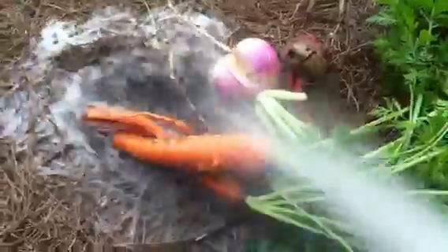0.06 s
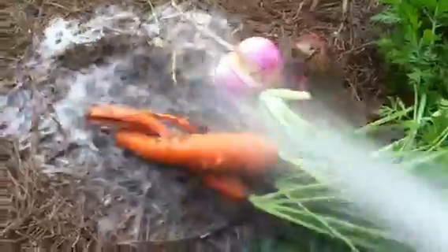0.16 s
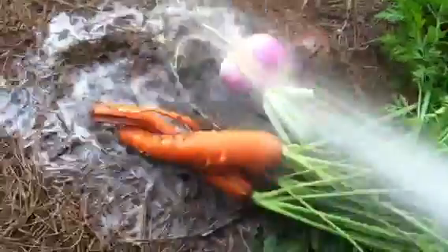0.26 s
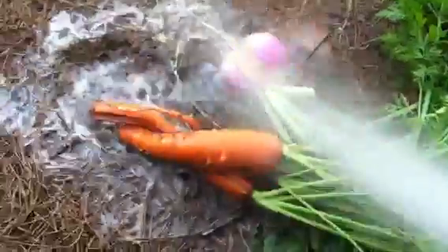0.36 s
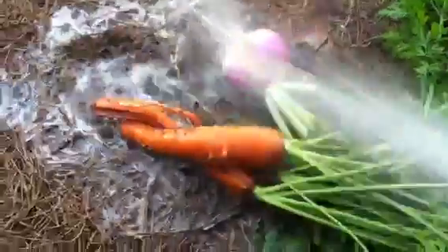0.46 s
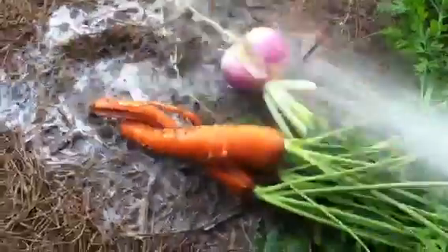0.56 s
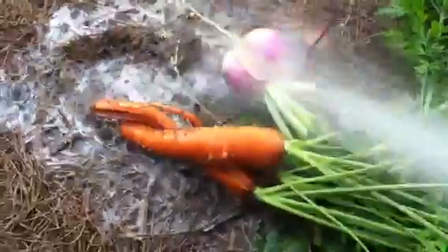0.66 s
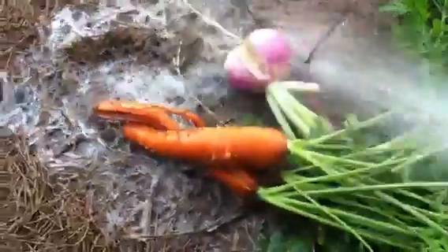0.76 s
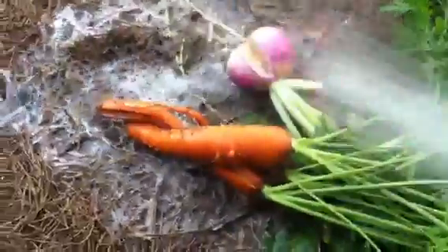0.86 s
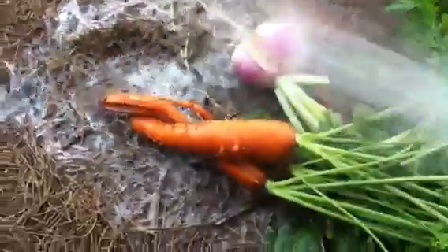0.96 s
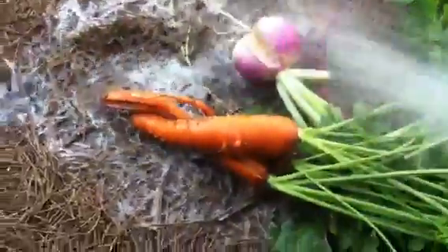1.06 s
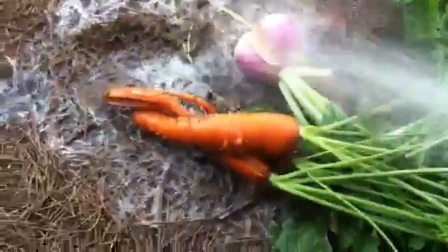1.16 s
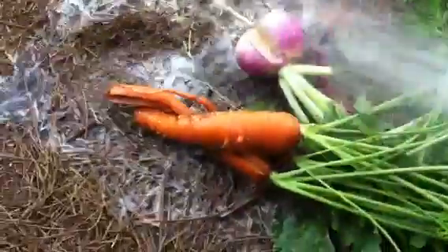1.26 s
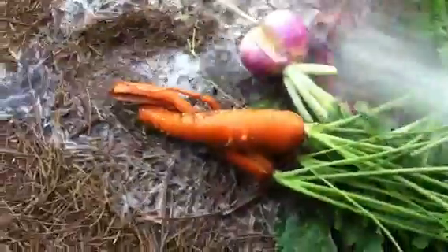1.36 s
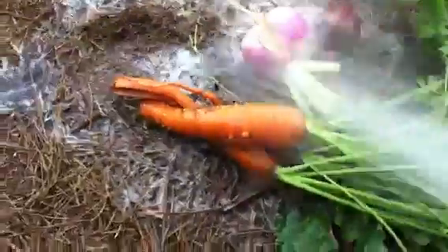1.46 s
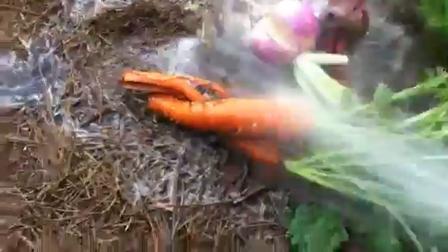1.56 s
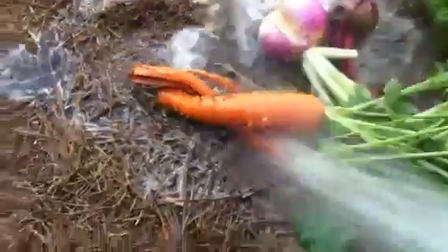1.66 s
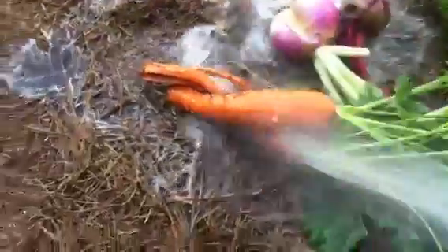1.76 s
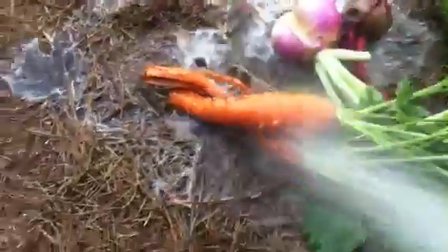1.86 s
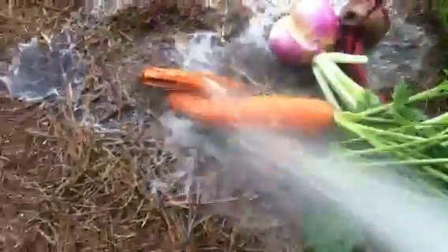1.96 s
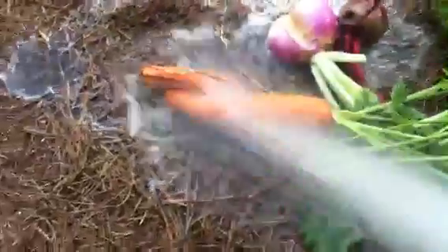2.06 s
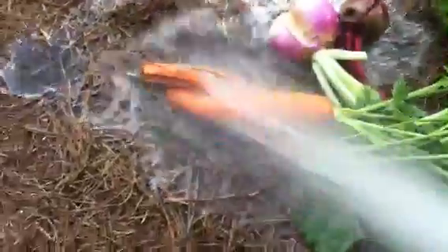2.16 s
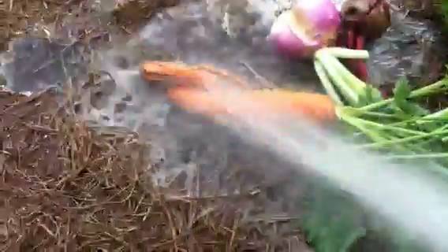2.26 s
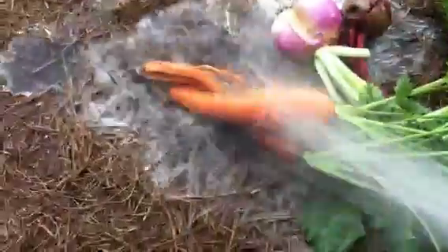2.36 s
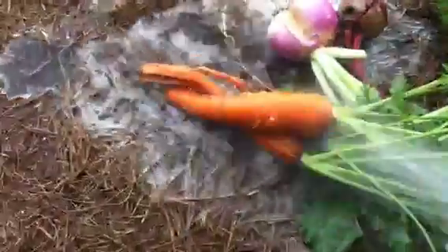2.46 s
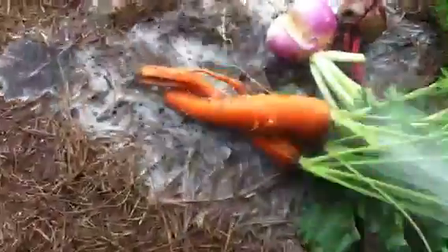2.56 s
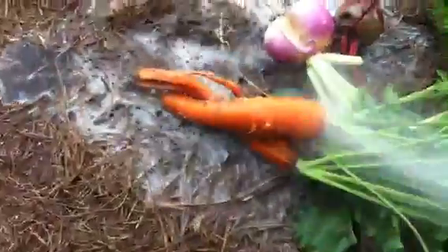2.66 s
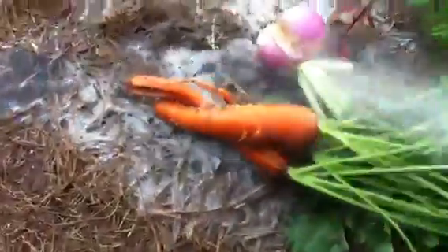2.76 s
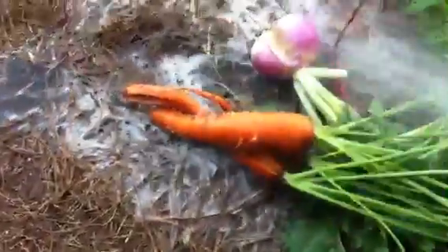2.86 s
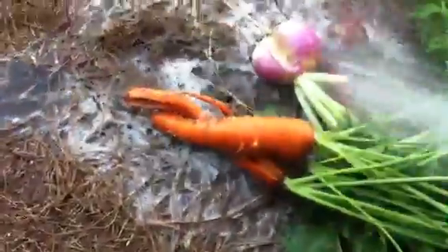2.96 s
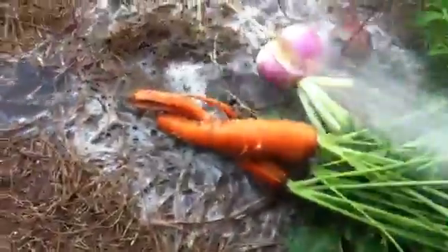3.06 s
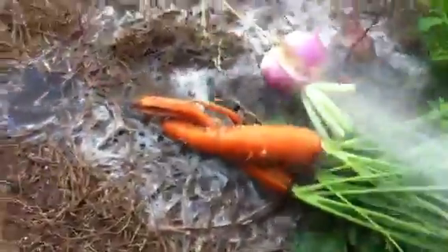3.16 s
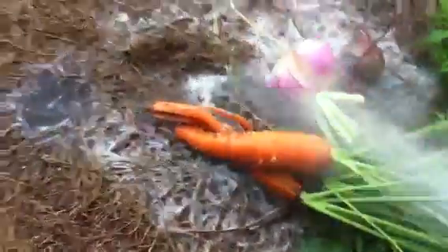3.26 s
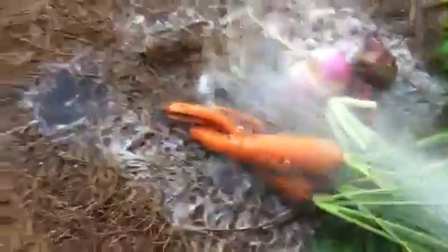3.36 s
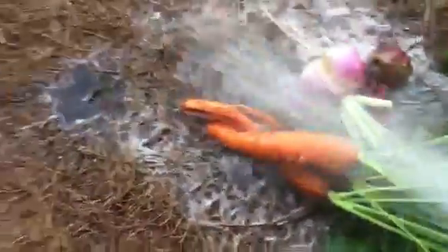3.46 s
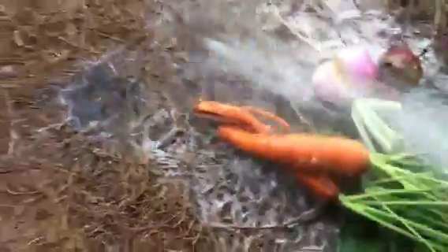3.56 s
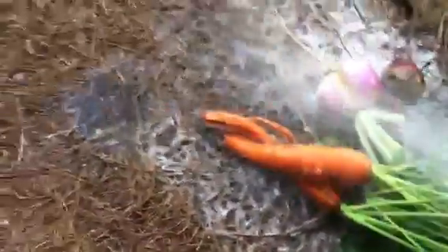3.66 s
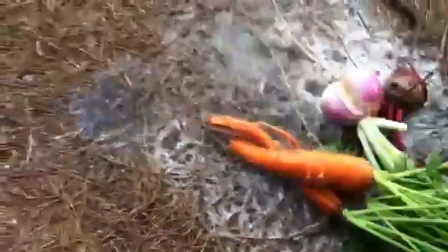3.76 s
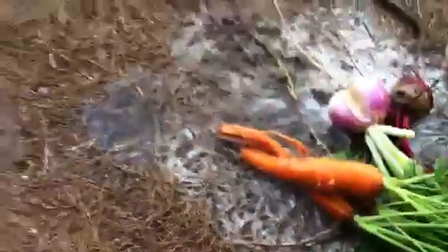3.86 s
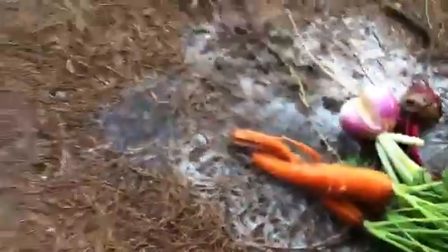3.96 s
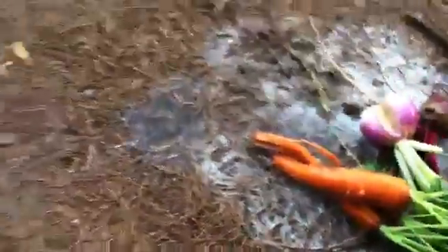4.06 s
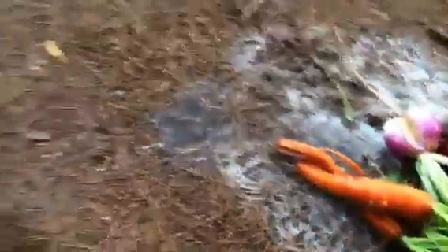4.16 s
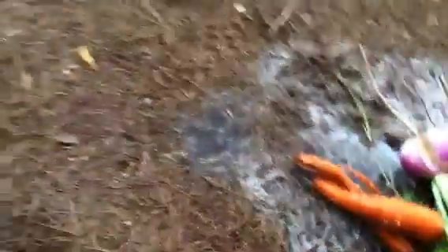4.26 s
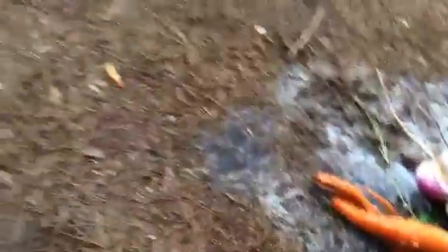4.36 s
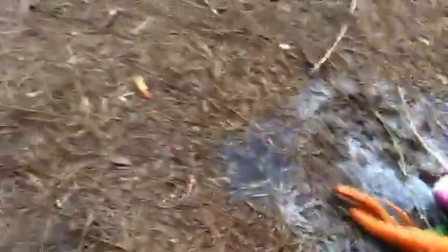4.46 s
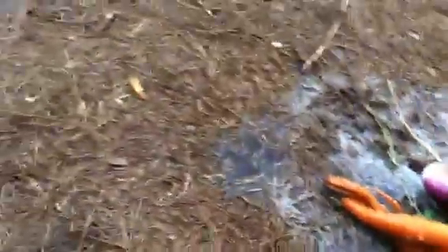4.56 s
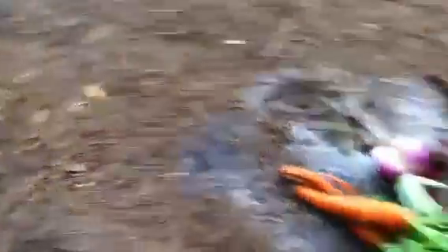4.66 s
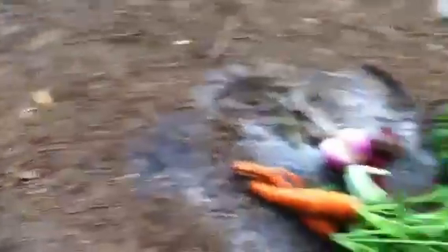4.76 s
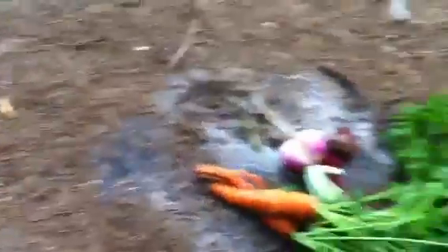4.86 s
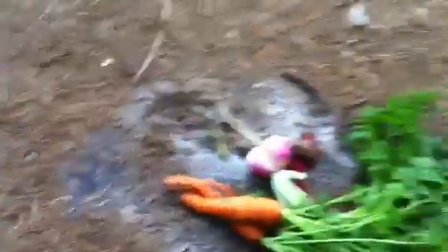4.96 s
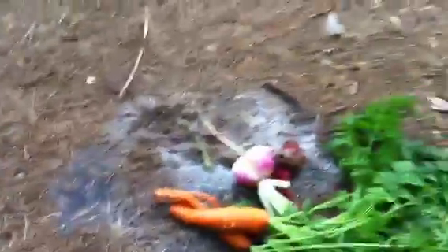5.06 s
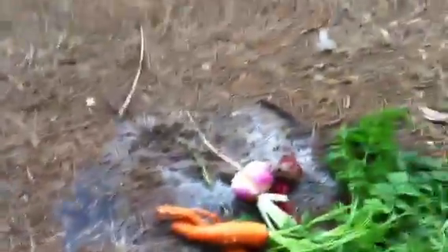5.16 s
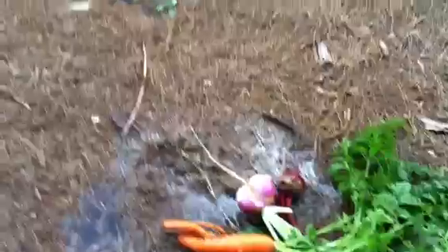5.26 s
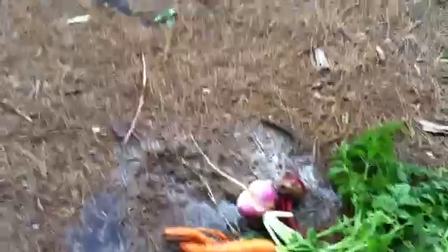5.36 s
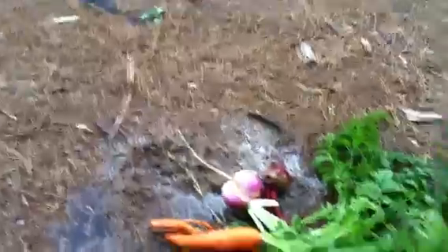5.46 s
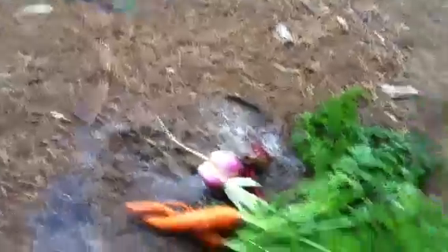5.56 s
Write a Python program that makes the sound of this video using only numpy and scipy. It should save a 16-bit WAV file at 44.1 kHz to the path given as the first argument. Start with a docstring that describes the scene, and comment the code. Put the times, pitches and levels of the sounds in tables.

```python
"""A hose nozzle close to the microphone sprays vegetables lying on soil until its valve shuts.
The spray is many tiny noise bursts mixed with patchy noise, filtered into fizz, hiss, spatter, tube
ring, splash and drumming; ringing slugs, low thuds and a whistle join it.
The valve eases, snaps nearly shut, lets one spurt through and seals. Then a quiet garden wash
remains, with rustling stalks (filtered snaps), faint gurgles (sliding tones) and one crunchy knock."""
import sys
import numpy as np
from scipy import signal
from scipy.io import wavfile
from scipy.ndimage import uniform_filter1d

SR = 44100
rng = np.random.default_rng(int(sys.argv[2]) if len(sys.argv) > 2 else 0)


def inscribe(sig):
    """Save sig as 16-bit PCM at rate SR to the path in sys.argv[1].

    A 1-D sig is mono; a 2-D sig holds one channel per row.
    Samples are clipped to [-1, 1] before scaling.
    """
    pcm = np.round(np.clip(np.atleast_2d(sig).T, -1, 1) * 32767)
    wavfile.write(sys.argv[1], SR, pcm.astype(np.int16))


N = 247356  # length of the scene in samples


def gain_of(db):
    """Turn decibels into a plain multiplier."""
    return 10 ** (np.asarray(db) / 20)


def evened(x):
    """Scale to an average (RMS) strength of 1."""
    return x / np.sqrt(np.mean(x ** 2) + 1e-20)


def follow(rows):
    """Draw straight lines between the rows of a table, giving each column at every sample."""
    s, *columns = np.transpose(rows)
    return [np.interp(np.arange(N) / SR, s, column) for column in columns]


def add(mix, s, sound):
    """Mix a short sound in at s seconds, cutting it off at the end of the scene."""
    part = mix[round(s * SR):][:len(sound)]
    part += sound[:len(part)]


def colour(x, points):
    """Filter to the given spectrum; the filter never acts ahead of time (minimum phase)."""
    f, db = np.transpose(points)
    hz = abs(np.fft.fftfreq(8192, 1 / SR))
    spectrum_db = np.interp(np.log(hz + 1), np.log(f + 1), db)
    log_gain = np.log(gain_of(np.maximum(spectrum_db, -90)))
    # the phase follows from the log gain
    response = np.exp(np.conj(signal.hilbert(log_gain)))
    taps = np.fft.ifft(response).real[:4096]
    return evened(signal.oaconvolve(x, taps)[:N])


def ticks(per_s, spread_db, length_s):
    """Short bursts of noise at random moments, many small and a few large."""
    chance, size, noise = rng.random(N), rng.exponential(1, N), rng.standard_normal(N)
    starts = chance < per_s / SR
    power = gain_of(2 * spread_db * np.minimum(size, 4.2)) * starts
    t = np.arange(400) / SR / length_s
    burst_power = t * np.exp(-4 * t)  # peaks a quarter of the way through the length
    return evened(noise * np.sqrt(abs(signal.oaconvolve(power, burst_power)[:N])))


def patchy(patchy_db, span_s):
    """Noise whose level wanders in patches of time and frequency."""
    a, b, patches = rng.standard_normal((N // 64 + 8, 129, 3)).T
    patches = uniform_filter1d(patches, 5, 0)  # smooth over frequency, then over time
    patches = uniform_filter1d(patches, max(round(span_s * SR / 64), 1), 1)
    z = (a + 1j * b) * gain_of(patchy_db * evened(patches))
    return evened(signal.istft(z, nperseg=256, noverlap=192)[1][:N])


def flutter(depth_db, span_s):
    """Smooth random wobble around 1, for a level or a pitch."""
    size = max(round(span_s * SR), 1)
    smooth = uniform_filter1d(uniform_filter1d(rng.standard_normal(N), size), size)
    return gain_of(depth_db * evened(smooth))


def resonate(x, hz, width_hz):
    """A resonance of gain 1 that follows the pitch hz."""
    turn = np.exp(2j * np.pi * np.cumsum(hz * np.ones(N)) / SR)
    r = np.exp(-np.pi * width_hz / SR)
    # shift the pitch down to zero, smooth, then shift it back
    return 2 * (turn * signal.lfilter([1 - r], [1, -r], x / turn)).real


# the jet swinging over the ground, before valve and flutter:
# (time [s], fizz level [dB], hiss level [dB], splash level [dB], drumming level [dB])
JET_LEVELS = [(0.0, -27, -30, -38, -44.5), (0.3, -27, -30, -45, -56), (0.43, -27, -31, -41.5, -51),
              (0.77, -28.5, -30, -46.5, -57), (0.87, -29, -31.5, -46, -55), (1.15, -29, -31, -46, -53.5),
              (1.46, -30.5, -31.5, -46, -54.5), (1.51, -26.5, -29.5, -43.5, -51),
              (1.57, -26, -31.5, -44.5, -52.5), (1.77, -26.5, -27.5, -43, -48),
              (1.82, -27, -30, -42.5, -55), (1.92, -26, -28.5, -42, -49), (2.01, -27, -29.5, -44.5, -47),
              (2.06, -26, -30, -42.5, -49), (2.17, -26.5, -30, -41.5, -50), (2.29, -26, -28.5, -41.5, -50),
              (2.35, -26, -29, -43, -49), (2.38, -26, -29, -42.5, -58), (2.42, -27, -30.5, -44, -55),
              (2.62, -30.5, -33, -45, -60), (2.74, -28, -31, -44.5, -52), (2.88, -30.5, -33, -47.5, -54.5),
              (3.27, -28.5, -31, -46, -52), (3.29, -27.5, -31, -44, -47), (3.46, -28, -30.5, -40, -49),
              (3.72, -29.5, -32, -44, -51), (3.74, -28.5, -30, -40, -49)]
# spatter on the vegetables, before valve and flutter: (time [s], level [dB])
SPATTER_LEVELS = [(0, -41), (.2, -39), (.45, -41.5), (.62, -43), (.8, -42), (1.1, -41.5), (1.46, -42.5),
                  (1.72, -37.5), (1.86, -40.5), (1.92, -36.5), (2.0, -39.5), (2.36, -38.5), (2.61, -41.5),
                  (3.0, -42), (3.24, -44), (3.3, -40), (3.5, -42.5), (3.74, -41)]
# how each part's sound is spread over pitch: (frequency [Hz], relative level per Hz [dB])
FIZZ_COLOUR = [(4000, -75), (7100, -10), (8040, -2), (9140, .5), (9960, -1), (11000, -10.5), (12700, -5.5),
               (13500, -9.5), (15000, -27), (15700, -30)]
HISS_COLOUR = [(2400, -48), (3450, -11), (3650, -6), (3820, 0), (4080, -3.5), (4450, 0), (4850, -2),
               (5080, -6.5), (5700, -6), (6450, -5), (7150, -9.5), (8500, -29.5)]
SPATTER_COLOUR = [(1200, -71), (2220, -10), (2430, -3), (2650, -5), (3150, 0), (3400, -1.5), (3650, -6),
                  (4400, -32.5)]
TUBE_COLOUR = [(400, -68), (800, -36), (1150, -14), (1420, -5.5), (1560, -1), (1640, 0.5), (1720, -2.5),
               (1830, -6), (2050, -12), (2220, -23), (2700, -44)]
SPLASH_COLOUR = [(120, -53), (250, -34), (400, -4.5), (480, -3.5), (600, -5.5), (800, 1), (1150, -2),
                 (1500, -24), (2000, -48.5)]
DRUM_COLOUR = [(25, -47), (60, -33), (120, -11.5), (200, -0.5), (290, 0), (380, -4.5), (550, -18),
               (900, -51.5)]
# droplets, one row each for fizz, hiss, spatter, tube, splash, drumming:
# (rate [bursts/s], size spread [dB], burst length [s], own bursts [share of power],
#  common bursts [share of power], patchiness of the remaining noise [dB])
DROPLETS = [(2055, 4, 0.00072, 0.42, 0.14, 0.5), (2030, 2, 0.0014, 0.29, 0.12, 1.5),
            (2000, 2, .0015, .25, .1, 1.5), (2500, 2.5, 0.0017, 0.22, 0.055, 1.7),
            (602, 3, 0.0021, 0.23, 0.067, 1.5), (150.6, 2.5, 0.0084, 0.14, 0.022, 1.4)]
# the tube ring takes a share of the fizz's swings and chokes as the valve eases
TUBE_DB, TUBE_SHARE, USUAL_FIZZ_DB = -34, 0.44, -28
CHOKE_DB, CHOKE_S = -6, 0.014
SPUTTER_DB, SPUTTER_S = 2.5, .004  # the flow breaks up once the valve eases: depth, smoothing time


def jet():
    """Droplet bursts and turbulence colour each part; all share the flow and its flutter."""
    fizz_db, hiss_db, splash_db, drum_db = follow(JET_LEVELS)
    spatter_db = follow(SPATTER_LEVELS)[0]
    choke = np.clip((np.arange(N) / SR - EASE_S) / CHOKE_S, 0, 1)
    tube_db = TUBE_DB + TUBE_SHARE * (fizz_db - USUAL_FIZZ_DB) + CHOKE_DB * choke
    flow = gain_of(valve()) * evened(flutter(0.45, 0.023) * flutter(0.74, 0.0032))
    flow = flow * flutter(SPUTTER_DB * choke, SPUTTER_S)
    common = ticks(1500, 4.4, 0.00028)  # bursts heard in every part at once
    colours = (FIZZ_COLOUR, HISS_COLOUR, SPATTER_COLOUR, TUBE_COLOUR, SPLASH_COLOUR, DRUM_COLOUR)
    levels = (fizz_db, hiss_db, spatter_db, tube_db, splash_db, drum_db)
    out = np.zeros(N)
    for part, db, drops in zip(colours, levels, DROPLETS):
        per_s, spread_db, length_s, own, shared, patchy_db = drops
        smooth = np.sqrt(max(1 - own - shared, 0))
        own_bursts = np.sqrt(abs(own)) * ticks(per_s, spread_db, length_s)
        bursts = own_bursts + np.sqrt(abs(shared)) * common
        out += gain_of(db) * colour(bursts + smooth * patchy(patchy_db, .04), part)
    out += whistle(tube_db)
    return flow * nozzle_notches(out)


# narrow whistle in the tube, before its small waver: (time [s], pitch [Hz])
WHISTLE_PITCH = [(0, 1610), (.5, 1624), (1.1, 1666), (1.5, 1615), (1.8, 1640), (2.1, 1590), (2.5, 1660),
                 (2.9, 1650), (3.3, 1554), (3.75, 1570)]
WHISTLE_DB, WHISTLE_WIDTH_HZ = -7.5, 75  # level against the tube ring


def whistle(tube_db):
    """Noise through a narrow resonance of the tube whose pitch drifts and wavers."""
    pitch = follow(WHISTLE_PITCH)[0] * flutter(0.16, 0.028)
    tone = evened(resonate(rng.standard_normal(N), pitch, WHISTLE_WIDTH_HZ))
    return gain_of(tube_db + WHISTLE_DB) * tone


# pitches that the nozzle cancels: (frequency [Hz], width [Hz], removed [share])
CANCELLED = [(2220, 136, 0.49), (5080, 170, 0.26), (7070, 270, 0.41)]


def nozzle_notches(out):
    """The nozzle partly cancels a few pitches: subtract a share of each narrow band."""
    for hz, width_hz, share in CANCELLED:
        out = out - share * resonate(out, hz, width_hz)
    return out


# spectrum of the outdoor wash: (frequency [Hz], relative level per Hz [dB])
GARDEN_COLOUR = [(25, -16), (60, -12), (120, 2.5), (240, -0.5), (850, -4), (1150, -6.5), (1900, -7.5),
                 (3500, -11), (4200, -8.5), (4750, -7), (5200, -12.5), (9500, -11), (11000, -17),
                 (14000, -21), (15500, -47)]
GARDEN_DB = -57.5
LULL_S, LULL_DB, LULL_WIDTH_S = 5.485, -2.5, .035  # the wash dips briefly


def garden():
    """Distant wash of the outdoors: patchy noise, coloured."""
    lull_db = LULL_DB * np.exp(-((np.arange(N) / SR - LULL_S) / LULL_WIDTH_S) ** 2)
    return gain_of(GARDEN_DB + lull_db) * colour(patchy(0.87, .06), GARDEN_COLOUR)


# the jet thumps into hollows of the wet soil, pitch before its waver:
# (time of peak [s], level [dB], pitch [Hz])
SOIL_THUDS = [(.21, -49, 250), (.42, -52, 260), (1.515, -44.5, 290), (1.75, -50.5, 200.5), (1.99, -44, 250),
              (2.0, -46, 330), (2.225, -45, 270), (2.25, -47.5, 204.6), (2.33, -49, 185), (3.39, -47, 280)]
THUD_S, THUD_WAVER_DB = .018, 1.1  # width of the swell; pitch waver as dB of frequency ratio


def thuds():
    """Thumps into wet hollows: short low tones that swell, fade and waver in pitch."""
    t, out = np.arange(-3 * THUD_S, 3 * THUD_S, 1 / SR), np.zeros(N)
    swell = np.exp(-.5 * (t / THUD_S) ** 2)
    waver = flutter(THUD_WAVER_DB, .01)
    for s, db, hz in SOIL_THUDS:
        start = s - 3 * THUD_S
        turns = np.cumsum(hz * waver[round(start * SR):][:len(t)]) / SR
        add(out, start, gain_of(db) * np.sqrt(2) * swell * np.sin(2 * np.pi * turns))
    return out


# big slugs of water leaving the nozzle: (start [s], peak level of the ring [dB], pitch [Hz])
WATER_SLUGS = [(.2500, -11.5, 8680), (.3244, -11, 9120), (.3688, -13, 8630), (.369, -21, 5600),
               (.445, -17.5, 4000), (.8, -16, 6000), (1.1105, -11.5, 9110), (1.48, -11.5, 9730),
               (1.598, -10.5, 8420), (1.7154, -11, 4370), (1.7278, -14, 8700), (1.8505, -15, 8800),
               (1.9347, -10, 8890), (2.1912, -10, 9090), (2.3273, -10, 9300), (2.992, -14, 8920),
               (3.1069, -9.5, 8700), (3.2633, -9.5, 8350), (3.7371, -13.5, 1570), (3.7385, -18, 2030),
               (3.7585, -17, 9400), (3.7605, -20, 9400), (3.8095, -20, 9230), (3.8095, -32, 1610),
               (3.8105, -28, 6100), (3.838, -30, 9500), (3.850, -33, 9300), (3.854, -39, 6800),
               (3.860, -35, 9300)]
SLUG_RISE_S, SLUG_SLOWING = 0.00029, 0.69  # rise at 9 kHz; lower rings rise slower (power of pitch)
SLUG_TICK_DB, SLUG_TICK_RISE_S = -12, 0.0003  # wide tick, level against the ring


def slugs():
    """Each slug rings a nozzle resonance for a few cycles and carries a wide tick in the hiss band."""
    out, t = np.zeros(N), np.arange(600) / SR
    noise = colour(rng.standard_normal(N), HISS_COLOUR)
    v = t / SLUG_TICK_RISE_S
    tick_shape = gain_of(SLUG_TICK_DB) * (v * np.exp(1 - v)) ** 2
    for s, db, hz in WATER_SLUGS:
        u = t / SLUG_RISE_S * (hz / 9000) ** SLUG_SLOWING
        ring = (u * np.exp(1 - u)) ** 1.7 * np.sin(2 * np.pi * hz * t)
        tick = tick_shape * noise[round(s * SR):][:len(t)]
        add(out, s, gain_of(db) * (ring + tick))
    return out


# the valve eases, snaps nearly shut, lets one spurt through, then seals
EASE_S, EASE_DB, SNAP_S, SNAP_DB_PER_S = 3.742, -8, 3.812, -480
SPURT_S, SPURT_DB, SPURT_RISE_DB_PER_S, SEAL_DB_PER_S = 3.856, -15.5, 180, -900
DRIBBLE_DB, DRIBBLE_DB_PER_S = -30, -150  # the last drops dribble away


def valve():
    """Flow in dB while the valve closes: the strongest of closing, spurt and dribble wins."""
    t = np.arange(N) / SR
    easing = EASE_DB * np.clip((t - EASE_S) / (SNAP_S - EASE_S), 0, 1)
    closing = easing + SNAP_DB_PER_S * np.maximum(t - SNAP_S, 0)
    spurt = SPURT_DB + np.where(t < SPURT_S, SPURT_RISE_DB_PER_S, SEAL_DB_PER_S) * (t - SPURT_S)
    dribble = DRIBBLE_DB + DRIBBLE_DB_PER_S * np.maximum(t - SPURT_S, 0)
    return np.maximum(np.maximum(closing, spurt), np.maximum(dribble, -100))


# dry stalks stirring:
# (time of peak [s], level before thinning [dB], rise [s], fall [s], body taken out [dB])
STIRS = [(4.388, -60, .02, .01, 12), (5.37, -56.5, 0.1, 0.08, -1), (5.565, -56, 0.02, .2, 0)]
# spectrum of the stalks: (frequency [Hz], relative level per Hz [dB])
STRAW_COLOUR = [(100, -20), (300, -3), (600, 1), (1200, -4), (1900, -3), (3200, -9), (4700, -4), (5300, -7),
                (8000, -14), (11500, -16), (14500, -35)]


def rustle():
    """Dense small snaps of dry stalks; each stir swells and dies away."""
    t = np.arange(N) / SR
    snaps = colour(0.56 * ticks(1500, 3.0, .001) + patchy(2.5, .03), STRAW_COLOUR)
    thin = evened(resonate(snaps, 5600, 1800))  # only the band around 5600 Hz
    out = np.zeros(N)
    for s, db, rise_s, fall_s, thin_db in STIRS:
        swell = np.exp(-((t - s) / np.where(t < s, rise_s, fall_s)) ** 2)
        body = 1 / gain_of(thin_db)
        out += gain_of(db) * swell * (body * snaps + (1 - body) * thin)
    return out


# faint gurgles, before pitch waver and level wobble:
# (start [s], length [s], starting pitch [Hz], peak level [dB])
BUBBLES = [(5.198, 0.04, 520, -61), (5.281, 0.027, 570, -54), (5.305, .05, 850, -59),
           (5.588, .02, 490, -53)]
GURGLE_RISE = .13  # upward slide, as a share of the pitch


def gurgle():
    """Wavering bubble tones that slide upward."""
    out, wobble, waver = np.zeros(N), flutter(4.0, .003), flutter(.6, .004)
    for s, length_s, hz, db in BUBBLES:
        u = np.arange(0, length_s, 1 / SR) / length_s
        pitch = hz * (1 + GURGLE_RISE * u) * waver[round(s * SR):][:len(u)]
        turns = np.cumsum(pitch) / SR
        add(out, s, gain_of(db) * np.sin(np.pi * u) * np.sin(2 * np.pi * turns))
    return wobble * out


# what the knocked object rings with: (frequency [Hz], width [Hz], relative level [dB])
KNOCK_RINGS = [(231, 110, -7), (654, 150, -1.5), (1100, 310, -1), (1710, 270, -4), (2350, 500, -9),
               (3100, 450, -7), (4000, 500, -2), (4780, 180, 0.5), (5800, 900, -11), (6900, 790, -2),
               (9000, 1500, -12), (11500, 1200, -14), (13500, 1500, -16)]
KNOCK_S, KNOCK_DB = 5.5335, -42.5  # start; average level of the first 800 samples
KNOCK_SWELL_S = 0.0023  # the push peaks after three of these
KNOCK_CHATTER_S, KNOCK_GRIT = .0021, .14  # rough pace of the jolts; grit against a jolt


def knock():
    """Quick jolts with grit between them swell for a moment and ring a dull object."""
    t = np.arange(4000) / SR
    # an unsteady clock gives a jolt each time it ticks over
    clock = np.cumsum(1 + 2.5 * rng.standard_normal(len(t))) / SR / KNOCK_CHATTER_S
    jolts = np.diff(np.floor(clock), prepend=0) > 0
    swell = (t / KNOCK_SWELL_S) ** 3 * np.exp(-t / KNOCK_SWELL_S)
    push = swell * (jolts + KNOCK_GRIT * rng.standard_normal(len(t)))
    body = np.zeros(len(t))
    for hz, width, db in KNOCK_RINGS:
        decay = np.sqrt(width) * np.exp(-np.pi * width * t)
        body += gain_of(db) * decay * np.sin(2 * np.pi * hz * t)
    body += .5 * (t == 0) * abs(body).max()  # part of the push is heard directly
    body = signal.lfilter(*signal.butter(2, 150, "high", fs=SR), body)  # small object: no deep bass
    crunch, out = signal.fftconvolve(push, body)[:len(t)], np.zeros(N)
    add(out, KNOCK_S, gain_of(KNOCK_DB) * crunch / np.sqrt(np.mean(crunch[:800] ** 2)))
    return out


def scene():
    """All sources added together, as one channel."""
    return (jet() + garden() + thuds() + slugs() + rustle() + gurgle() + knock())[None]


EDGE_HZ = 15720  # top of the passed band


def record(dry):
    """The small microphone drops the deep bass; then a steep filter removes the highest treble."""
    thin = signal.sosfilt(signal.butter(1, 30, "high", fs=SR, output="sos"), dry)
    band_limit = signal.firwin(1023, EDGE_HZ, window=("kaiser", 9), fs=SR)
    return signal.oaconvolve(thin, band_limit[None], "same")


dry = scene()
out = record(dry)
inscribe(out)
```